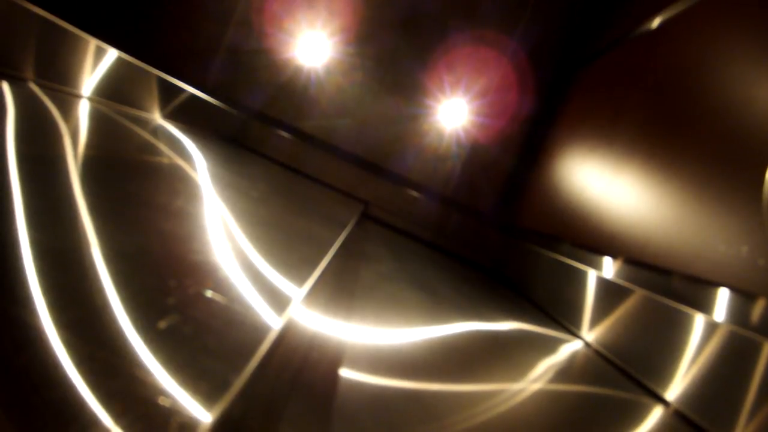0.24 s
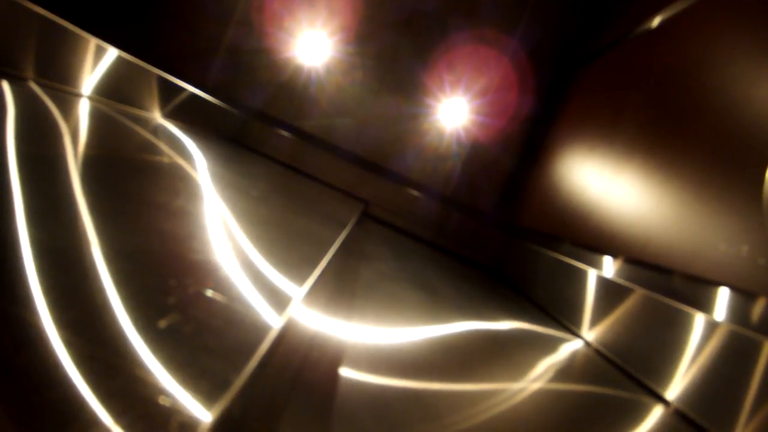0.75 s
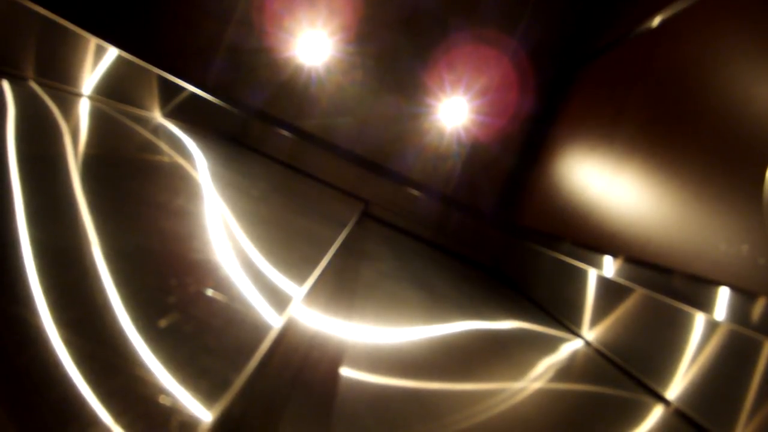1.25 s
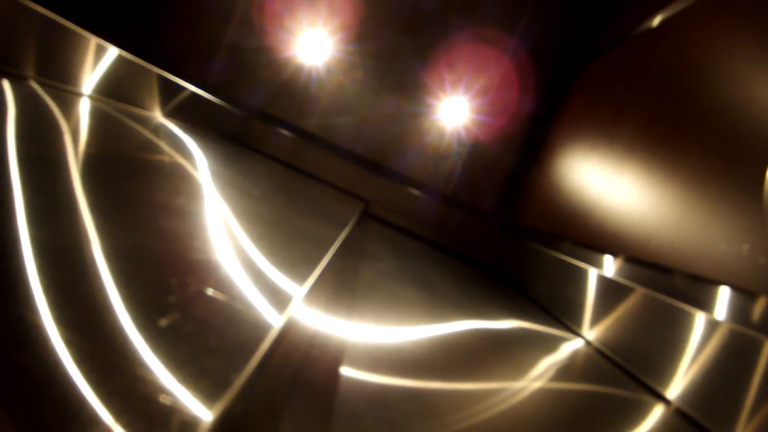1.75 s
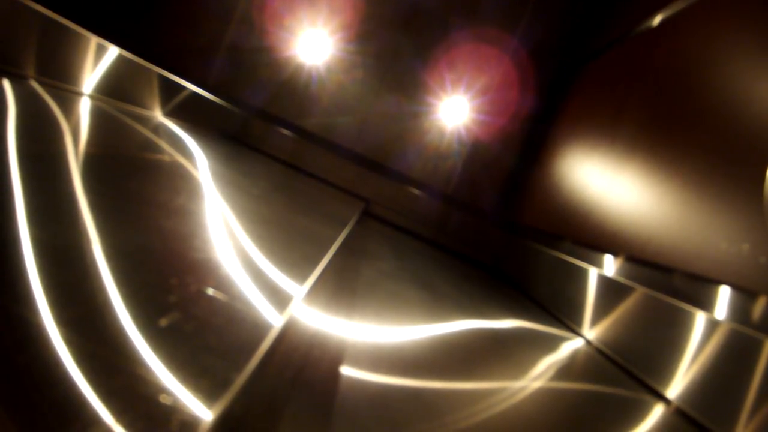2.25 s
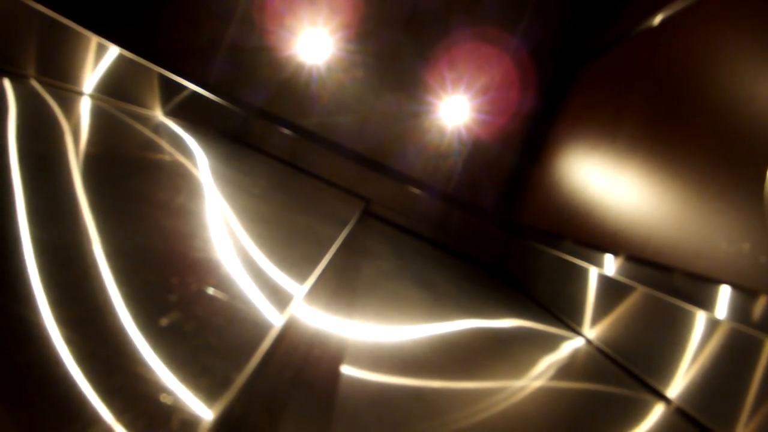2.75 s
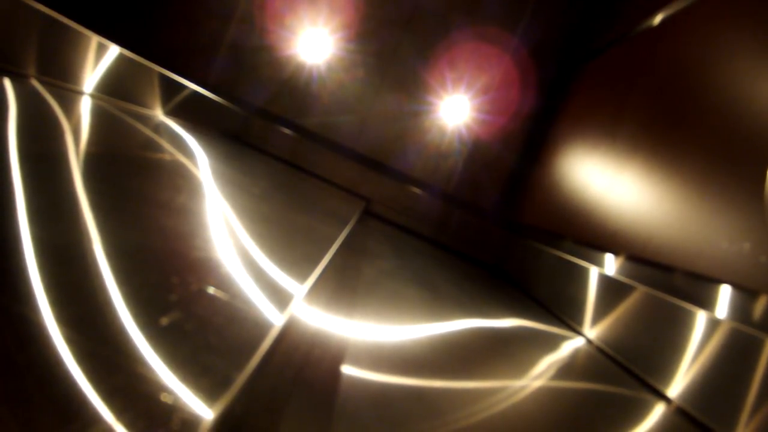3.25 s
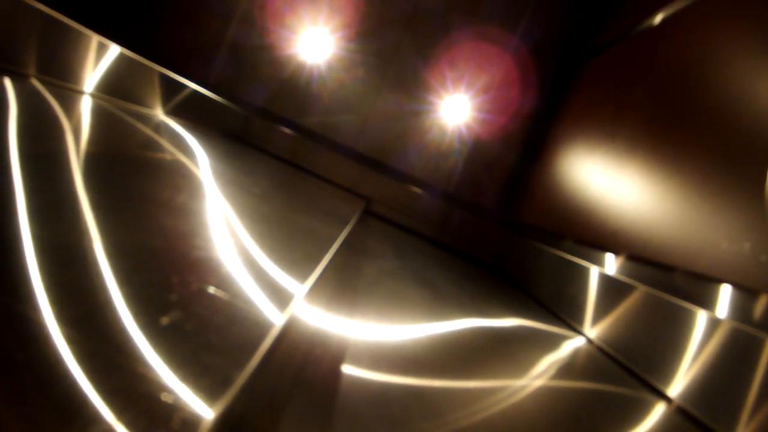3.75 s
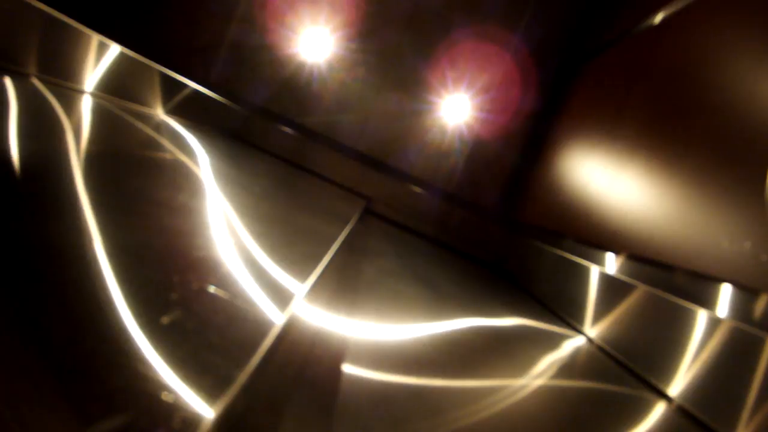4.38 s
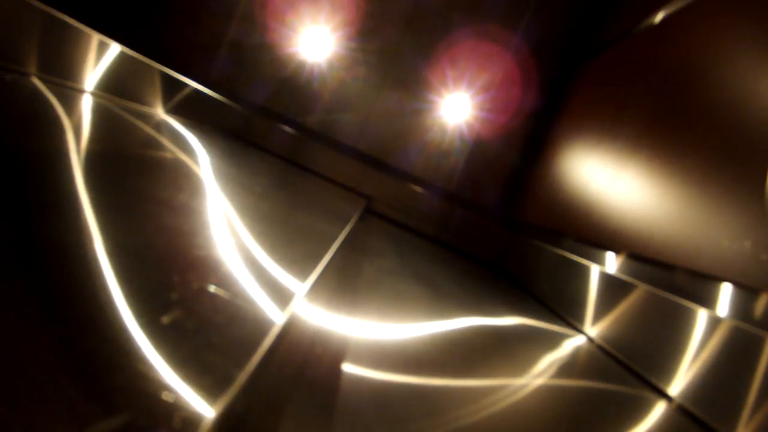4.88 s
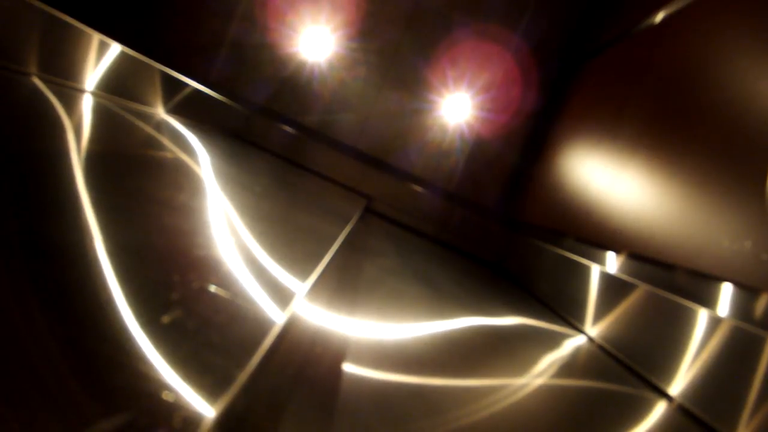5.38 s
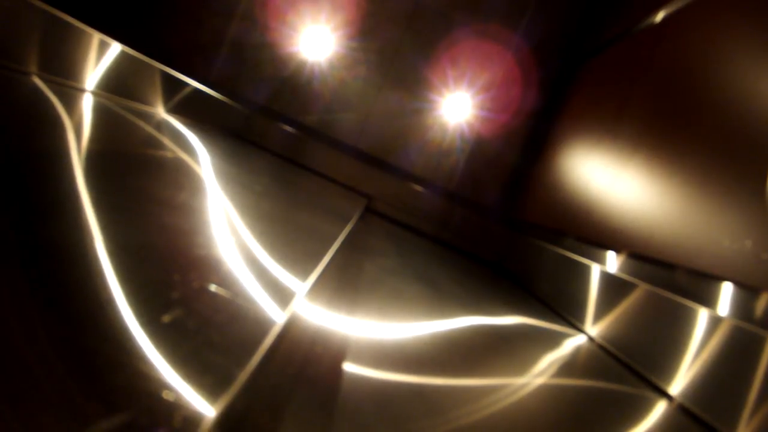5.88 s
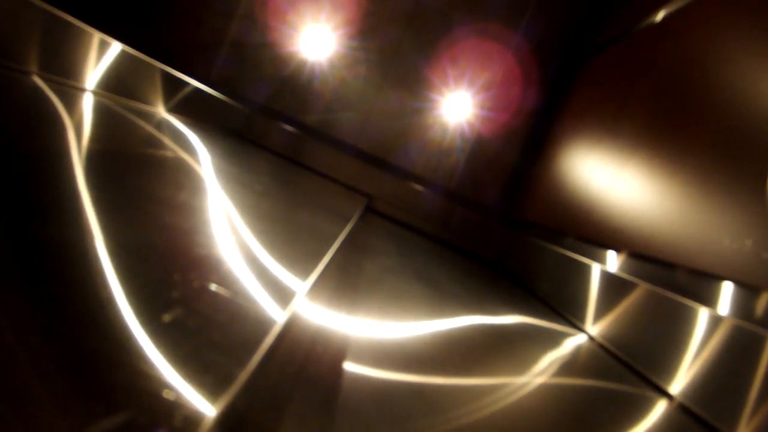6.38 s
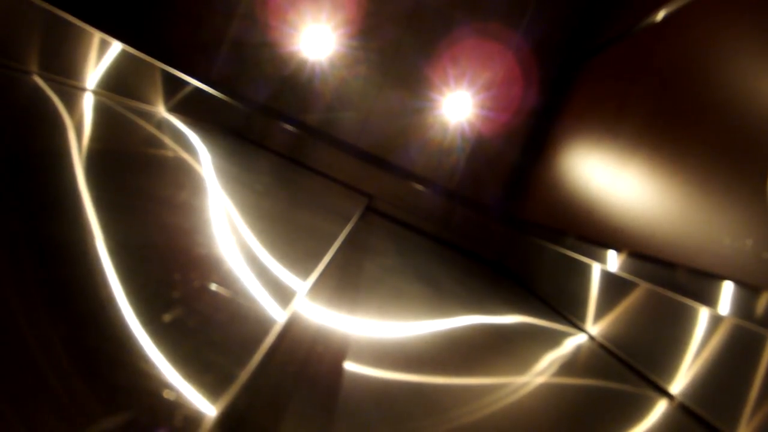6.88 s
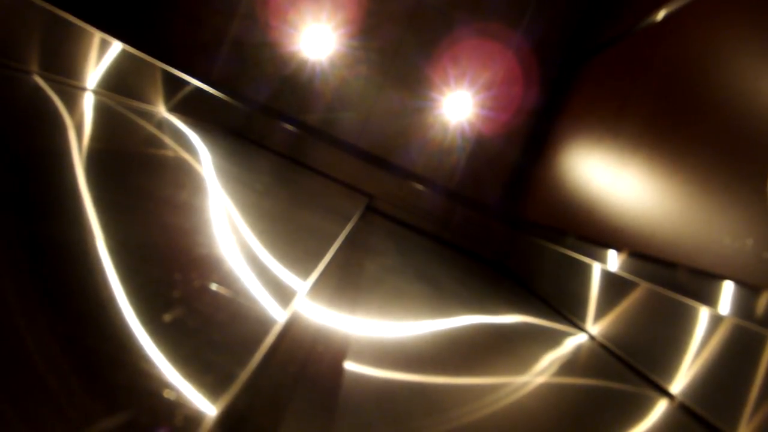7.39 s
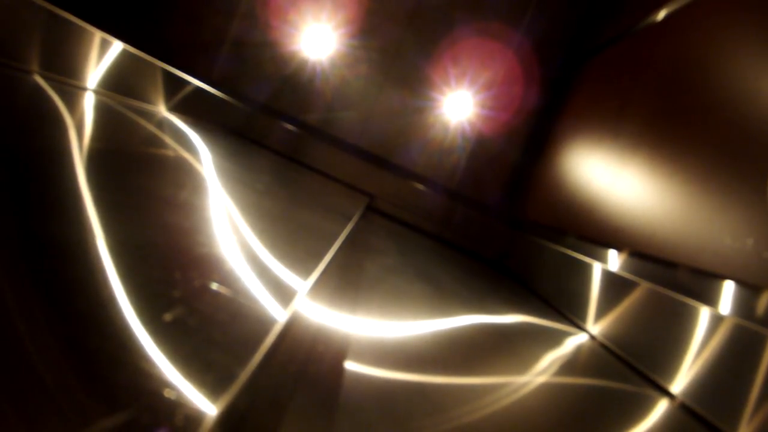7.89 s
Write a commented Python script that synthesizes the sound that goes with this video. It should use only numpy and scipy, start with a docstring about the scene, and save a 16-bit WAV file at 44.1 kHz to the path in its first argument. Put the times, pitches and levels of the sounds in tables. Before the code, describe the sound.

Hard, ringing metal knocks come every second or so over the low machinery drone of a moving lift, heard from inside.

```python
"""Inside a lift car travelling along its shaft. The drive forces the panels into a rumble and hum
under a wavering drone, and the guide shoes hiss along the rails in swells of sliding friction.
Seven hard knocks strike the frame, excite the modes of cabin and metalwork, and reverberate away
down the shaft. A pair of microphones hears it through a gain control that ducks after each blow."""
import sys
import numpy as np
from scipy import signal
from scipy.fft import rfft, irfft, next_fast_len
from scipy.io import wavfile

SR = 44100
rng = np.random.default_rng(int(sys.argv[2]) if len(sys.argv) > 2 else 0)


def output_pcm(signal):
    """Save a mono or channel-first signal as 16-bit PCM at the path in sys.argv[1].

    Samples are clipped to [-1, 1] before scaling.
    """
    pcm = np.clip(np.atleast_2d(signal).T, -1, 1) * 32767
    wavfile.write(sys.argv[1], SR, np.round(pcm).astype(np.int16))


N = 358533
TIME = np.arange(N) / SR


def amp(db):
    """Amplitude grows tenfold for every 20 dB."""
    return 10 ** (np.asarray(db) / 20)


def unit_rms(x):
    """Normalisation to an rms of 1."""
    return x / np.sqrt(np.mean(x ** 2) + 1e-20)


def read(points, hz):
    """Interpolation of (Hz, value) rows on a log-frequency axis."""
    f, value = np.transpose(points)
    return np.interp(np.log(hz + 1), np.log(f + 1), value)


def curve(rows):
    """Linear interpolation of (seconds, value) rows."""
    return np.interp(TIME, *np.transpose(rows))


def wander(rate_hz):
    """Random modulation of rms 1."""
    knots = rng.standard_normal(size=4000)
    return unit_rms(np.interp(TIME * rate_hz, np.arange(len(knots)), knots))


def add(mix, start_s, sound):
    """Superposition: a sound sums into the mix from start_s on."""
    part = mix[:, max(round(start_s * SR), 0):][:, :sound.shape[-1]]
    part += sound[..., :part.shape[-1]]


def broad(points):
    """A continuous spectrum: gain against frequency, from (Hz, dB) rows."""
    return lambda hz: amp(read(points, hz))


def peaks(rows, width_hz):
    """A resonant spectrum: narrow peaks at (Hz, dB), summed in power."""
    return lambda hz: np.sqrt(sum((amp(db) / (1 + (2 * (hz - f) / width_hz) ** 2)) ** 2 for f, db in rows))


# Likeness of left and right. Each row: frequency in Hz, correlation from 0 to 1.
COHERENCE = [(100, .995), (1000, .998), (3000, .997), (6000, .98), (12000, .99)]

def noise(colour, size=N, coherence=COHERENCE):
    """Partial coherence: shared and opposed noise make a stereo pair of rms 1, shaped by colour(Hz)."""
    length = next_fast_len(size)
    hz = np.fft.rfftfreq(length, 1 / SR)
    shared, apart = rfft(rng.standard_normal((2, length)))
    same = np.clip(read(coherence, hz), 0, 1)
    pair = shared * np.sqrt(1 + same) + np.array([[1], [-1]]) * apart * np.sqrt(1 - same)
    return unit_rms(irfft(pair * colour(hz), length)[:, :size])


# Faint steady hiss. Each row: frequency in Hz, relative spectral density in dB.
FLOOR_SPECTRUM = [(50, 6.5), (200, 8.5), (640, -4.5), (1400, -6), (3100, -15.5), (7000, -22.5), (9000, -27),
                  (12000, -47.5)]

def noise_floor(level_db=-42.0):
    """Incoherent noise: each microphone has a hiss of its own."""
    return amp(level_db) * noise(broad(FLOOR_SPECTRUM), coherence=[(0, 0)])


# Thin electronic whine. Each row: frequency in Hz, relative level in dB.
WHINE_TONES = [(14357, -79.5), (15612, -81)]

def whine(level_db=3):
    """Pure tones: the electronics oscillate faintly at fixed frequencies."""
    return sum(amp(level_db + db) * np.sin(2 * np.pi * hz * TIME) for hz, db in WHINE_TONES)


# Load on the drive. Each row: time in seconds, relative level in dB.
DRIVE_LOAD = [(0, 1), (.7, -6), (1.0, 3), (1.4, 4.5), (1.65, -3.5), (2.4, 0), (3.15, 2.5), (3.42, -1.5),
              (4.12, 5), (4.68, 0.5), (5.35, 2.5), (5.75, -2), (6.2, 0), (6.75, 0.5), (7.05, 3.5),
              (7.6, 3.5), (8.1, 2.5)]
# The car's rumble. Each row: frequency in Hz, relative spectral density in dB.
RUMBLE_SPECTRUM = [(20, -46), (40, -10), (55, -5.5), (120, -2.5), (180, -6.5), (300, 0), (400, -4.5),
                   (500, -14), (700, -17.5), (1000, -27.5), (2000, -40), (4000, -68), (8000, -52),
                   (16000, -50.5)]
# Resonances of the running car. Each row: frequency in Hz, relative level in dB.
HUM_RESONANCES = [(57, -63), (81, -101), (100, -55), (116, -46), (132, -34), (159, -41), (180, -50),
                  (221, -31.5), (240, -35), (256, -39.5), (277, -37.5), (331, -35), (358, -38), (398, -41),
                  (417, -36.5), (458, -46), (476, -45.5), (519, -66), (719, -56)]

def drive(rumble_db=-26, hum_db=-26.0, rumble_follows=0.27):
    """Forced vibration: the machinery shakes the car, which rumbles and hums more under load."""
    load_db = curve(DRIVE_LOAD)
    rumble = amp(rumble_db + rumble_follows * load_db) * noise(broad(RUMBLE_SPECTRUM))
    hum = amp(hum_db + load_db) * noise(peaks(HUM_RESONANCES, width_hz=6.6))
    return rumble + hum


# The drive strains, mostly near a knock. Each row: start in seconds, length in seconds, level in dB.
DRIVE_STRAINS = [(0.044, 0.15, -20), (1.656, 0.24, -17), (2.498, 0.21, -19), (3.675, 0.18, -19),
                 (4.78, 0.059, -21), (5.96, 0.45, -17.5), (7.777, .17, -19)]

def drone(level_db=-29, follows=1.07, pitch_hz=330, waver_hz=5.46, flutter_db=2.5):
    """Amplitude and frequency modulation: the drive's wavering tone swells with load and each strain."""
    level = amp(level_db + follows * curve(DRIVE_LOAD))
    for start, length, db in DRIVE_STRAINS:
        arch = np.sin(np.pi * np.clip((TIME - start) / length, 0, 1))
        level = np.hypot(level, amp(db) * np.sqrt(abs(arch)))
    phase = 2 * np.pi * np.cumsum(pitch_hz + waver_hz * wander(rate_hz=40)) / SR
    return level * amp(flutter_db * wander(rate_hz=30)) * np.sin(phase)


# The shoes' rub and fine hiss. Each row: frequency in Hz, relative spectral density in dB.
RUB_SPECTRUM = [(200, -2), (600, 6.5), (1200, 1.5), (2200, -4.5), (3200, -6.5), (5000, -16.5), (9000, -44),
                (16000, -40)]
HISS_SPECTRUM = [(1000, -18), (3000, 2.5), (6000, 0), (11000, -1.5), (14000, -4), (16000, -12)]
# Tight stretches of rail. Each row: middle and half-height width in seconds, rub and hiss levels in dB.
TIGHT_STRETCHES = [(0.144, 0.076, -43.5, -51.5), (1.637, 0.41, -44, -57), (2.342, 0.22, -39.5, -48),
                   (2.713, .24, -39.5, -50.5), (3.087, 0.37, -38.5, -47.5), (3.85, 0.53, -44.5, -53),
                   (4.16, .12, -45, -51.5), (4.64, 0.37, -40, -48), (6.2, .035, -36, -51),
                   (6.297, 0.32, -40.5, -51), (6.787, 0.22, -42.5, -50), (7.0, 0.4, -41.5, -52)]

def guide_shoes(rub_db=-53, hiss_db=-68, swish_db=1.5, grain_db=0.3):
    """Sliding friction: the shoes rub with a slightly uneven grip and swish where the rail is tight."""
    rub_power, hiss_power = amp(rub_db) ** 2, amp(hiss_db) ** 2
    for middle, width, tight_rub_db, tight_hiss_db in TIGHT_STRETCHES:
        press = amp(swish_db) * .5 ** ((2 * (TIME - middle) / width) ** 2)
        rub_power += (amp(tight_rub_db) * press) ** 2
        hiss_power += (amp(tight_hiss_db) * press) ** 2
    grip = amp(grain_db * wander(rate_hz=54))
    rub = np.sqrt(rub_power) * noise(broad(RUB_SPECTRUM))
    hiss = np.sqrt(hiss_power) * noise(broad(HISS_SPECTRUM))
    return grip * (rub + hiss)


# Tiny squeaks of the shoes. Each row: start in seconds, length in seconds, level in dB.
SHOE_SQUEAKS = [(2.17, 0.076, -61), (4.802, .07, -61), (5.07, 0.19, -58), (7.24, 0.076, -61)]

def squeaks(pitch_hz=14640, octave_below_db=-9):
    """Stick-slip oscillation: a shoe briefly gives a very high, slightly unsteady tone."""
    out = np.zeros((2, N))
    for start, length, db in SHOE_SQUEAKS:
        size = int(length * SR)
        phase = 2 * np.pi * np.cumsum(pitch_hz * (1 + .001 * wander(rate_hz=60)[:size])) / SR
        tone = np.sin(phase) + amp(octave_below_db) * np.sin(phase / 2)
        add(out, start, amp(db) * signal.windows.tukey(size, .5) * tone)
    return out


# Colour of the shaft's echo. Each row: frequency in Hz, relative spectral density in dB.
SHAFT_SPECTRUM = [(25, -44), (60, -6), (130, -2), (250, -4), (400, 1), (520, -4), (720, -6), (900, -9.5),
                  (1300, -12.5), (2200, -20.5), (3200, -19.5), (4500, -27), (7000, -40), (15000, -56.5)]
# Its decay. Each row: frequency in Hz, T60 in seconds before stretching, share present at once.
SHAFT_REVERB = [(80.6, 1.85, 1), (306, 1.22, 0.32), (710, 0.96, 0.13), (1490, 0.72, 0.31),
                (3180, 0.64, 0.22), (7040, 0.54, 0.36), (14000, 0.41, 0.74)]

def shaft_echo(t, tint, stretch, swell_s=0.12, chatter_db=1.0, return_s=0.09, return_db=2.0):
    """Reverberation: a dense tail builds in the shaft, rebounds, then loses its treble first."""
    hz, frame_s, spectra = signal.stft(noise(broad(SHAFT_SPECTRUM), len(t)), SR, nperseg=512)
    t60, early = (read(np.array(SHAFT_REVERB)[:, [0, k]], hz)[:, None] for k in (1, 2))
    build = early + (1 - early) * (1 - np.exp(-(frame_s / swell_s) ** 2))
    decay = amp(read(tint, hz)[:, None] - 60 * frame_s / (stretch * t60))
    tail = signal.istft(spectra * build * decay, SR, nperseg=512)[1][:, :len(t)]
    rebound_db = return_db * np.exp(-((t - return_s) / 0.019) ** 2)  # back from the far end of the shaft
    reflections_db = chatter_db * wander(rate_hz=150)[:len(t)]  # single reflections stand out
    return tail * amp(rebound_db + reflections_db) * (1 - np.exp(-t / 0.00046))


# Bright ringing of the metal fittings. Each row: frequency in Hz, relative level in dB.
FITTING_MODES = [(2210, 7), (2794, 9.5), (2978, 2), (3330, 8.5), (3560, 0), (4007, 2)]

def fittings(t, t60=0.58, low_hz=2400, high_hz=3650, loose_db=3):
    """Shock-excited resonance: small metal parts jangle, the loose ones at new pitches each time."""
    loose = [(hz, loose_db) for hz in rng.uniform(low_hz, high_hz, size=16)]
    ring = noise(peaks(FITTING_MODES + loose, width_hz=40), len(t))
    return ring * amp(-60 * t / t60) * (1 - np.exp(-t / 0.0018))


# A steel panel's modes. Each row: multiple of its pitch, relative level in dB, T60 in seconds.
PANEL_MODES = [(0.898, -1.5, 0.93), (.96, -2.5, 0.83), (1, -6.5, 1), (1.035, -7, 0.88),
               (1.168, -10.5, 0.94), (1.828, -5.5, 0.23)]

def panel(t, pitch_hz, rise_s=0.046):
    """Beating: a loose steel panel takes up the shock, and its close modes interfere."""
    ring = sum(amp(db - 60 * t / t60) * np.sin(2 * np.pi * (ratio * pitch_hz * t + rng.random()))
               for ratio, db, t60 in PANEL_MODES)
    return ring * (1 - np.exp(-t / rise_s))


# Modes of the cabin and its walls. Each row: frequency in Hz, relative level in dB.
CABIN_MODES = [(81, -11), (102, 4.5), (145, -7), (221, 2), (248, -14), (382, -5.5), (452, -3), (544, -3),
               (624, -3), (684, -6), (716, -14), (818, -10), (947, -14)]

def cabin_boom(t, favoured_hz, favour_db=5, t60_at_100hz=1.314, damping_slope=0.3, rise_s=0.078):
    """Normal modes: the cabin's ringing builds and dies, higher modes sooner; each blow favours some."""
    ring = 0
    for hz, db in CABIN_MODES:
        level_db = db + favour_db * np.exp(-(np.log(hz / favoured_hz) / 0.099) ** 2)
        t60 = t60_at_100hz * (100 / hz) ** damping_slope
        phase = 2 * np.pi * (hz * rng.uniform(.99, 1.01) * t + rng.random())
        ring += amp(level_db - 60 * t / t60) * np.sin(phase)
    return ring * (1 - np.exp(-t / rise_s))


def thump(t, hz=74, peak_s=0.013, delay_s=0.0042):
    """Damped oscillation: the whole car is shoved through a few slow cycles just behind the blow."""
    late = np.maximum(t - delay_s, 0)
    return -np.sin(2 * np.pi * hz * late) * late / peak_s * np.exp(1 - late / peak_s)


def snap(t, delay_s=.0026, width_s=0.00013):
    """A short pulse has a wide spectrum: the metal bottoms out brightly just after first touch."""
    age = np.maximum(t - delay_s, 0) / width_s
    return age * (2 - age) * np.exp(-age)


# Modes of the frame. Each row: nominal frequency in Hz, relative level in dB, T60 in seconds.
FRAME_MODES = [(291, -3, 0.038), (401, -5.5, 0.046), (654, -2.5, 0.027), (1032, -0.5, 0.0084),
               (1665, -14.5, 0.014), (2650, -14, 0.013), (3530, -23, 0.011)]

def blow(t, tint, rise_s=0.002, crack_db=-11, crack_t60=0.037, tint_share=0.82):
    """Impact: metal meets metal with a crack, and where it lands weights the frame's damped modes."""
    modes = 0
    for k, (hz, db, t60) in enumerate(FRAME_MODES):
        decay = amp(db + tint_share * read(tint, hz) - 60 * t / t60)
        modes += (-1) ** k * decay * np.sin(2 * np.pi * hz * rng.uniform(0.95, 1.03) * t)
    crack_colour = broad([(200, -83), (900, 16.0), (2200, 8.5), (4000, -7.5), (7000, -37.0), (15000, -44)])
    crack = amp(crack_db - 60 * t / crack_t60) * noise(crack_colour, len(t))
    return (modes + crack) * (1 - np.exp(-t / rise_s))


# Knocks on the frame. Each row: start in seconds; offsets in dB for blow, thump, boom, body, clang,
# rattle and sizzle; panel pitch in Hz; panel offset in dB; the cabin's favoured frequency in Hz.
FRAME_KNOCKS = [(.151, 2, -4, 1.5, 2.5, 1.5, 4.5, 2, 682, 2, 102),
                (1.817, 0, -10, -1, 2, 1, 6, 0, 385, 7.5, 207),
                (2.6501, 2.5, -4.5, -1, -4, 2, 1, 4, 690, 0.5, 150),
                (4.164, 0, -3, -2, 2.5, 3.5, 4, 3.5, 373, 3.5, 220),
                (4.861, 2, -4, 1, 1.5, -1, -1.5, 11, 706.6, -0.5, 312),
                (6.394, -5, 1, -3, -4, 0, 0, -.5, 895, -11, 80),
                (7.1075, 1, 3, 6.5, 4.5, 5, -.5, 6.5, 722, 10.5, 78)]

def knocks(blow_db=3, snap_db=2.0, thump_db=-4, cabin_db=-10.5, panel_db=-13.5, fittings_db=-27.0,
           echo_db=-1):
    """Impulse response: each knock jolts the frame, rings cabin and metal, and echoes down the shaft."""
    out = np.zeros((2, N))
    t = np.arange(SR * 3 // 2) / SR
    for (start, force_db, shove_db, boom_db, body_db, clang_db, rattle_db, sizzle_db,
         pitch_hz, ring_db, cabin_hz) in FRAME_KNOCKS:
        tint = [(130, boom_db), (230, body_db), (450, body_db), (700, clang_db), (1400, clang_db),
                (3000, rattle_db), (5000, rattle_db), (9000, sizzle_db)]
        stretch = 0.75 + 0.0366 * body_db  # a knock with more body echoes longer
        add(out, start, amp(blow_db + force_db) * blow(t, tint))
        add(out, start, amp(snap_db) * snap(t))
        add(out, start, amp(thump_db + shove_db) * thump(t))
        add(out, start, amp(cabin_db + boom_db) * cabin_boom(t, cabin_hz))
        add(out, start, amp(panel_db + ring_db) * panel(t, pitch_hz))
        add(out, start, amp(fittings_db + rattle_db) * fittings(t))
        add(out, start, amp(echo_db) * shaft_echo(t, tint, stretch))
    return out


# Left-right balance of the sound. Each row: frequency in Hz, left minus right level in dB.
STEREO_BALANCE = [(60, 5), (300, 3.5), (1200, 4), (2800, 5), (5000, 5.5), (8000, 0), (15000, -.4)]

def scene():
    """Superposition: the lift's sounds sum, louder on the left, with the top treble centred."""
    lift = drive() + drone() + guide_shoes() + squeaks() + knocks() + whine()
    size = next_fast_len(N + 4096)
    balance_db = read(STEREO_BALANCE, np.fft.rfftfreq(size, 1 / SR)) * np.array([[.5], [-.5]])
    return irfft(rfft(lift, size) * amp(balance_db), size)[:, :N] + noise_floor()


def overshoot(power_db, threshold_db, recover_db_per_s):
    """Peak detection: the excess over a threshold, forgotten at a steady rate."""
    fall = TIME * recover_db_per_s
    return np.maximum(np.maximum.accumulate(power_db + fall) - fall - threshold_db, 0)


def record(dry, low_cut_hz=34, high_cut_hz=15900, attack_s=0.0019, quick_share=0.45, slow_share=0.23,
           makeup_db=1.0):
    """Compression: after a low cut, quick and slow gain controls duck; peaks clip; the top is cut."""
    dry = signal.sosfilt(signal.butter(3, low_cut_hz, "high", fs=SR, output="sos"), dry)
    left_power = signal.lfilter([1 / 200], [1, 1 / 200 - 1], dry[0] ** 2)  # 200-sample running mean
    power_db = 10 * np.log10(left_power + 1e-12)
    duck_db = (quick_share * overshoot(power_db, threshold_db=-12, recover_db_per_s=97)
               + slow_share * overshoot(power_db, threshold_db=-13, recover_db_per_s=11))
    lag = np.exp(-1 / (attack_s * SR))
    ducked = dry * amp(makeup_db - signal.lfilter([1 - lag], [1, -lag], duck_db))
    low_pass = signal.firwin(511, high_cut_hz, window=("kaiser", 9), fs=SR)
    return signal.oaconvolve(np.clip(ducked, -1, 1), low_pass[None], "same", axes=1)


dry = scene()
out = record(dry)
output_pcm(out)
```